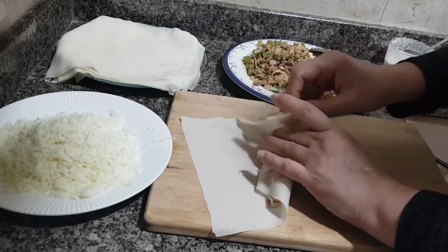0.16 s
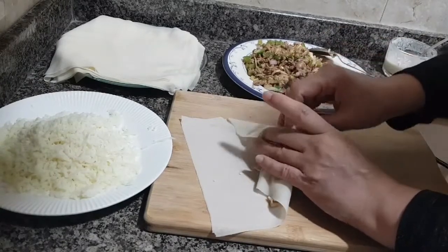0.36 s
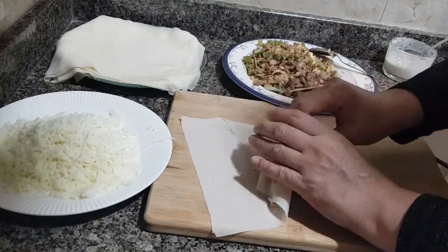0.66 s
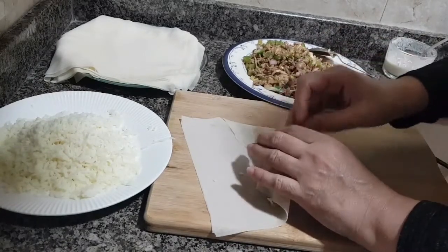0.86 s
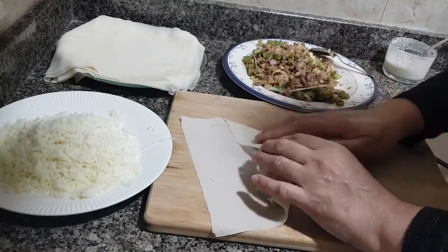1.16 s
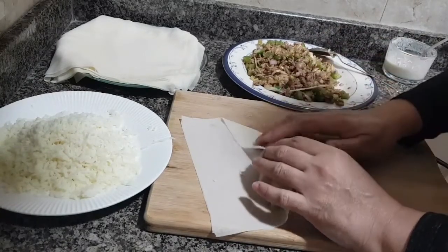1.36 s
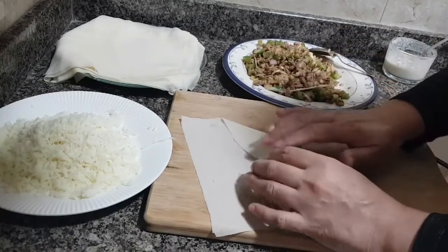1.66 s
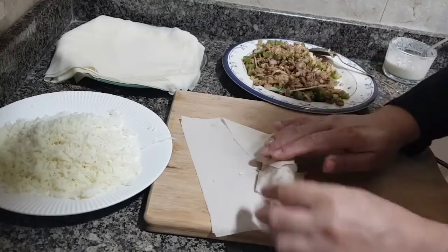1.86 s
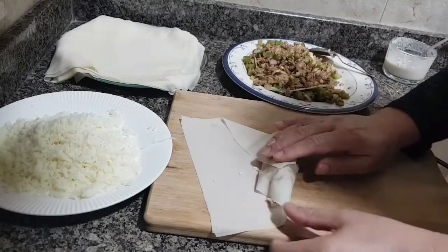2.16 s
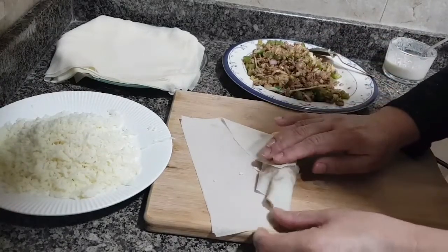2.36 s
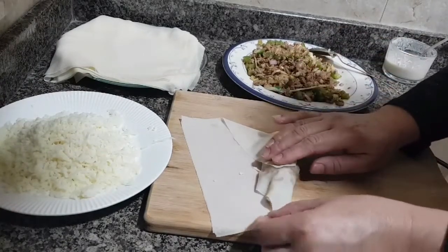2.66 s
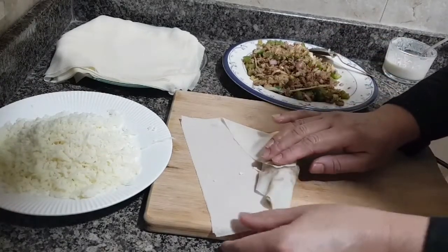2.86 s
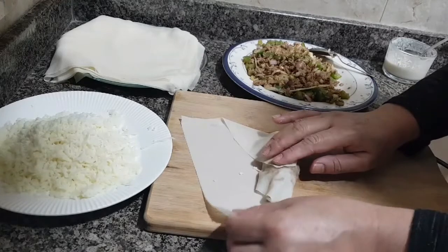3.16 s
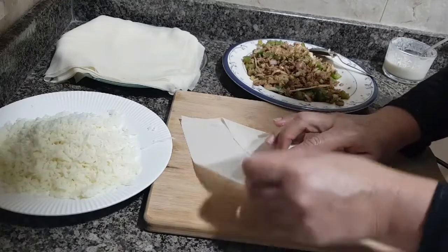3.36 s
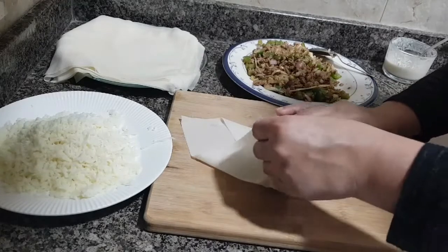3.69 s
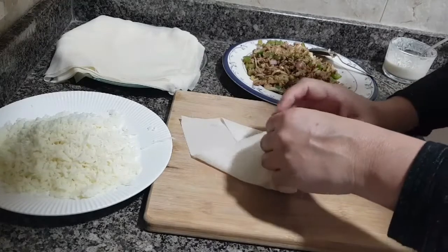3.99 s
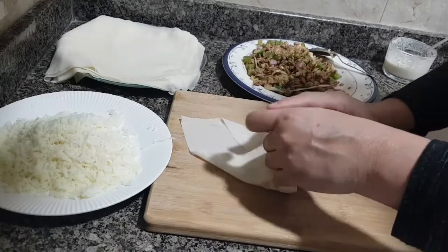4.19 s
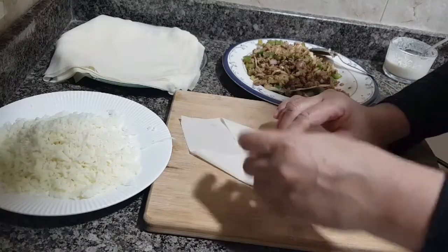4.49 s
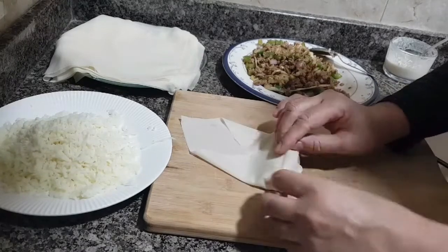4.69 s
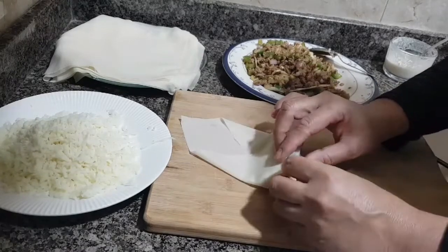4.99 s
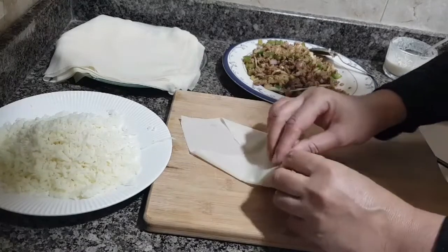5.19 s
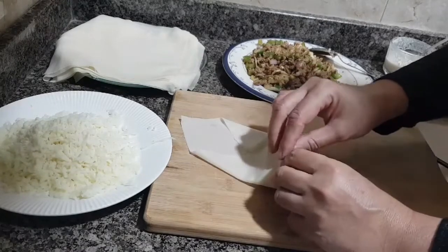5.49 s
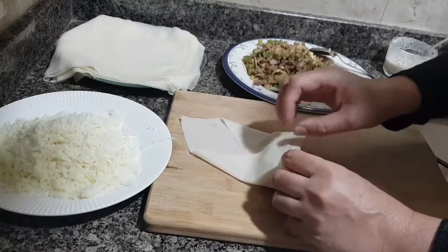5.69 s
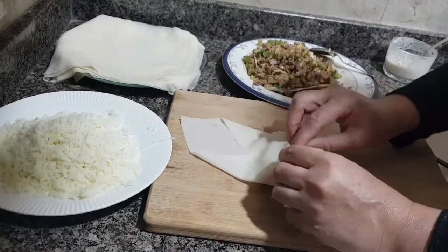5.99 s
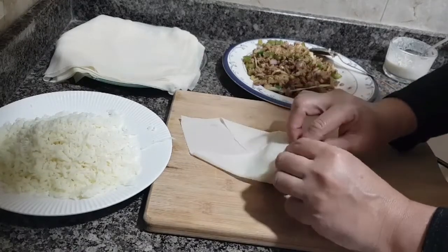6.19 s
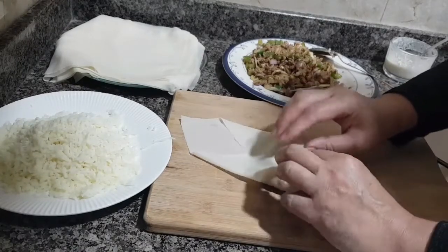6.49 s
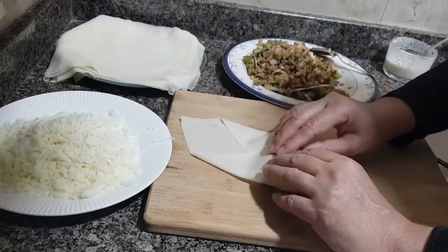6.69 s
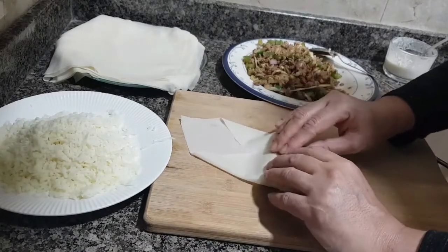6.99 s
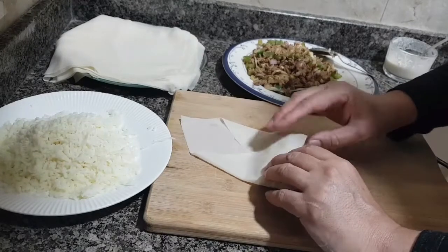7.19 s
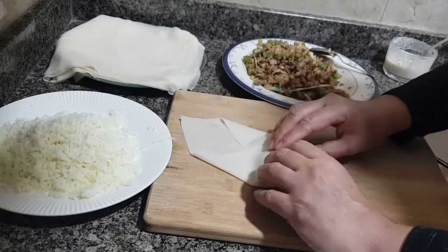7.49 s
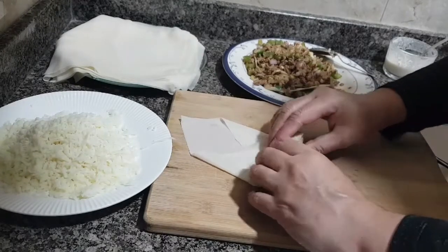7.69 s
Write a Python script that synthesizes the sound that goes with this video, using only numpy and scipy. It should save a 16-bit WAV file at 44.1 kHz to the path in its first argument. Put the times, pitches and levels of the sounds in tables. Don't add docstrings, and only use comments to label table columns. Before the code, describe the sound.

Continuous ventilation noise in a small hard-surfaced kitchen, heavy in the bass, with uneven low throbs, a constant hum and a thin mid-pitched whine above it. Early on, a small object clicks once on a hard counter with a short room echo. A distant tap adds soft, bright hiss in brief touches, then about a second from just after two, and nearly two seconds at the end. Wide stereo pickup.

```python
import sys
import numpy as np
from scipy import signal
from scipy.fft import rfft, irfft, next_fast_len
from scipy.io import wavfile
from scipy.ndimage import uniform_filter1d, map_coordinates

SR = 44100
rng = np.random.default_rng(int(sys.argv[2]) if len(sys.argv) > 2 else 0)


def magnitude_from_level(level_db):
    exponent = np.asarray(level_db, float) / 20
    return 10 ** exponent


def master_out(mix):
    frames = np.transpose(np.atleast_2d(mix))
    ceiling = np.clip(frames, -1, 1)
    pcm = np.round(ceiling * 32767).astype(np.int16)
    wavfile.write(sys.argv[1], SR, pcm)


N = 346185
STEP = 32
GRID_S = np.arange(0, N + STEP, STEP) / SR


def unit(x):
    return x / np.sqrt(np.mean(x ** 2) + 1e-20)


def along(points, hz):
    f, v = np.transpose(points)
    return np.interp(np.log(hz + 1), np.log(f + 1), v)


def level_curve(rows):
    s, db = np.transpose(rows)
    return magnitude_from_level(np.interp(np.arange(N) / SR, s, db))


def fine(coarse):
    return np.interp(np.arange(N) / STEP, np.arange(len(coarse)), coarse)


def wobble(rate):
    knots = rng.standard_normal(N // 100)
    return fine(map_coordinates(knots, [GRID_S * rate]))


def surges(s, db, length_s):
    from_peak = (GRID_S - s[:, None]) / length_s[:, None]
    return magnitude_from_level(db)[:, None] * np.exp(-2 * from_peak ** 2)


def filtered(x, response):
    m = next_fast_len(x.shape[-1] + SR // 2)
    spectrum = rfft(x, m) * response(np.fft.rfftfreq(m, 1 / SR))
    return irfft(spectrum, m)[..., :x.shape[-1]]


def resonances(modes, f):
    total = 0
    for k, (c, w, db) in enumerate(modes):
        total = total + (-1) ** k * magnitude_from_level(db) * 1j * f * w / (c * c - f * f + 1j * f * w)
    return total


def bumps(modes, f):
    return magnitude_from_level(sum(db / (1 + (2 * (f - c) / w) ** 2) for c, w, db in modes))


def tone(hz, level, flutter_db, drift_hz, rate, lead=0):
    phase = 2 * np.pi * np.cumsum(hz + drift_hz * wobble(rate)) / SR
    loudness = np.sqrt(2) * level * magnitude_from_level(flutter_db * wobble(rate))
    return loudness * np.sin(phase + lead * np.array([[.5], [-.5]]))


def spaced(pair):
    # frequency in Hz, correlation.
    likeness = [(30, .995), (160, .995), (240, .5), (300, .8), (370, .4), (520, .9), (620, .55), (800, .6),
                (1200, .5), (2000, .25), (4000, .05), (16000, 0)]
    # frequency in Hz, phase in radians.
    right_lead = [(30, 0), (200, 0), (240, 1), (300, .4), (390, 1.3), (520, .2), (850, .7), (1250, 2.8),
                  (1700, 3.3), (3000, 6)]

    def mid_side_gains(hz):
        turn = np.arccos(np.clip(along(likeness, hz), -1, 1)) / 2
        return np.array([np.cos(turn), np.sin(turn)])

    mid, side = filtered(pair, mid_side_gains)
    left_right = np.array([mid + side, mid - side])
    half = np.array([[-.5], [.5]])
    return filtered(left_right, lambda hz: np.exp(1j * along(right_lead, hz) * half))


def tail(live):
    # frequency in Hz, time to fall 60 dB in seconds.
    ring_time = [(100, 0.62), (1000, 0.54), (3000, 0.27), (8000, 0.25), (15000, 0.074)]
    hz, t, z = signal.stft(rng.standard_normal((2, SR // 2)), SR, nperseg=256)
    decay = magnitude_from_level(-60 * t / (live * along(ring_time, hz)[:, None]))
    answer = spaced(signal.istft(z * decay, SR, nperseg=256)[1])
    return answer / np.linalg.norm(answer[0])


def diffuse(colour, paths_db):
    answer = filtered(tail(live=1.0), lambda hz: hz / (hz + 900))
    source = rng.standard_normal((1, N + SR))
    point = signal.fftconvolve(source, answer, axes=1)[:, SR:SR + N]
    even = spaced(rng.standard_normal((2, N)))
    return unit(filtered(even + magnitude_from_level(paths_db) * point, colour))


def tap():
    # start in seconds, end in seconds, level in dB, splash in dB.
    runs = [(-.1, .06, -64, 6), (.33, .37, -74, 0), (0.878, 0.967, -71.5, -3), (1.96, 2.032, -63, 5),
            (2.13, 2.16, -68, -3), (2.258, 3.385, -63.5, 0), (2.9, 3.1, -71, -3), (3.157, 3.391, -66.5, 6),
            (3.421, 3.5, -72, -2), (5.33, 5.402, -72, 0), (6.016, 7.999, -65, -6), (7.4, 7.55, -73, -6)]
    # frequency in Hz, density in dB per Hz.
    spray_colour = [(1500, -42), (3500, -15), (4700, -7), (5800, -7.5), (7000, -2.5), (8500, -1.5),
                    (10500, -4), (13000, -5), (16000, -11)]
    # frequency in Hz, width in Hz, lift in dB.
    pipe = [(5210, 220, 13.5), (6860, 370, 2), (8270, 630, 2.4), (10500, 360, 1.8), (12000, 500, 2.5)]
    open_db_per_s, shut_db_per_s, trickle_db = 350, 260, -78

    start, end, db, splash_db = np.transpose(runs)[:, :, None]
    opening_db = open_db_per_s * np.maximum(start - GRID_S, 0)
    shutting_db = shut_db_per_s * np.maximum(GRID_S - end, 0)
    flow = magnitude_from_level(db - opening_db - shutting_db)

    def flow_level(each):
        return fine(np.sqrt(magnitude_from_level(2 * trickle_db) + (each ** 2).sum(0)))

    spray = diffuse(lambda hz: magnitude_from_level(along(spray_colour, hz)) * bumps(pipe, hz), paths_db=3)
    splash = diffuse(lambda hz: resonances([(3560, 2000, 0)], hz) ** 2, paths_db=4)
    water = flow_level(flow) * spray + magnitude_from_level(-7) * flow_level(flow * magnitude_from_level(splash_db)) * splash
    return magnitude_from_level(1.0 + 0.71 * wobble(20)) * water


def clicks():
    # time in seconds, peak in dB, left-right balance in dB.
    blows = [
        (1.1885, -38.5, -2),
    ]
    # frequency in Hz, width in Hz, level in dB.
    object_modes = [(2463, 700, 2), (3400, 640, 4), (5540, 1700, -8), (8350, 790, -6.5), (10600, 1756, -12)]
    out = np.zeros((2, N + SR))
    t = np.arange(SR // 4) / SR
    for s, db, pan_db in blows:
        room = magnitude_from_level(6.0) * tail(live=.8)[:, :len(t)]
        near_echoes = magnitude_from_level(-17.0 - 60 * t / 0.057) * rng.standard_normal((2, len(t)))
        heard = room + near_echoes
        heard[:, 0] += magnitude_from_level(-3 + pan_db * np.array([.5, -.5]))
        first = round(s * SR)
        out[:, first:first + len(t)] += magnitude_from_level(db + 19) * heard
    return filtered(out[:, :N], lambda hz: resonances(object_modes, hz))


def room_modes():
    # frequency in Hz, width in Hz, level in dB.
    lowest_modes = [(68.9, 7.8, 0.5), (81.4, 6.1, -1)]
    steady_modes = [(101.5, 8.5, 0), (147.8, 11.6, -2.5), (179, 28, -12.5)]
    boom_mode = [(133.4, 8.2, 0)]
    # time in seconds, peak in dB, length in seconds.
    drone_surges = [(0.08, -37, 0.11), (0.49, -39, 0.11), (0.88, -38.5, 0.24), (1.31, -45, 0.23),
                    (1.598, -42, 0.09), (2.008, -39.8, 0.22), (2.22, -39, 0.042), (2.403, -31.5, 0.055),
                    (2.545, -31, 0.035), (2.794, -33, 0.1), (2.976, -34, 0.048), (3.19, -43.7, 0.22),
                    (3.48, -39.5, 0.23), (3.942, -46, 0.22), (4.264, -35, 0.053), (4.37, -38, 0.042),
                    (4.61, -35, 0.12), (5.083, -37.5, 0.15), (5.283, -32, 0.036), (5.91, -44, 0.23),
                    (6.253, -43.2, 0.07), (6.601, -35, 0.05), (6.741, -37, 0.055), (6.98, -35.5, 0.055),
                    (7.16, -47, 0.071), (7.429, -45.5, 0.22), (7.616, -34, 0.036), (7.82, -32.5, 0.12)]
    # time in seconds, peak in dB, length in
    # seconds, pitch in Hz.
    boom_surges = [(0.07, -37, 0.062, 130.3), (0.26, -35, 0.19, 132.1), (0.458, -37.5, 0.071, 131.3),
                   (0.58, -35, 0.052, 135.1), (0.918, -32, 0.24, 132.4), (1.155, -39.5, 0.055, 133),
                   (1.402, -35, 0.14, 133.5), (1.688, -35.5, 0.13, 135), (1.985, -32, 0.11, 133.2),
                   (2.442, -36, 0.15, 135), (2.926, -33.5, 0.16, 132.1), (3.21, -37, 0.17, 129.5),
                   (3.5, -40, 0.049, 131.5), (3.61, -37, 0.23, 133.2), (3.778, -33.5, 0.05, 132.8),
                   (4.444, -42.5, 0.23, 136.1), (5.294, -39.5, 0.13, 133.1), (5.43, -39.5, 0.2198, 135.4),
                   (5.52, -36.5, 0.07, 133.9), (5.713, -37, 0.059, 136.1), (5.891, -34, 0.12, 137.3),
                   (6.092, -38.5, 0.04, 132.8), (6.389, -30.5, 0.16, 133), (6.703, -30.5, 0.068, 134.5),
                   (7.14, -38.5, 0.22, 134.1), (7.598, -33.5, 0.072, 132.4),
                   (2.24, -40, 0.091, 138.2),
        (4.021, -39, 0.061, 130.1),
        (4.842, -40, 0.049, 135.1),
        (7.82, -38.5, .08, 137.6),
    ]

    def ring(modes):
        noise = spaced(rng.standard_normal((2, N)))
        return unit(filtered(noise, lambda f: resonances(modes, f) / (1 + (f / 215) ** 8)))

    lowest = ring(lowest_modes)
    swell = np.sqrt(np.abs(uniform_filter1d(lowest[0] ** 2, 4000))) + 0.045
    drive = magnitude_from_level(-40.5) + fine(surges(*np.transpose(drone_surges)).sum(0))
    drone = filtered(drive * lowest / swell, lambda hz: 1 / (1 + (52 / (hz + 1)) ** 8))

    s, db, length_s, hz = np.transpose(boom_surges)
    each = surges(s, db, length_s)
    total = each.sum(0)
    pitch_hz = (hz @ each + hz.mean() * 1e-5) / (total + 1e-5)
    boom = tone(fine(pitch_hz), 1.315 * fine(total), flutter_db=2, drift_hz=2.205, rate=16)
    return drone + magnitude_from_level(-39.5) * ring(steady_modes) + boom + magnitude_from_level(-44.5) * ring(boom_mode)


def fan():
    # frequency in Hz, density in dB per Hz.
    air = [(20, -16.5), (45, -6), (120, -0.5), (210, -4), (260, -9), (460, -17.5), (1000, -16.5),
           (1600, -12), (1800, -25.5), (2800, -30), (3200, -35), (5000, -41.5), (9000, -46), (16000, -51.5)]
    # frequency in Hz, width in Hz, lift in dB.
    duct = [(427, 70, 6.5), (551, 71, 5.5), (640, 32, -3.5), (671.4, 30, 7), (988, 120, 3),
            (1480, 300, -6.5), (2150, 510, 3), (2770, 29, 7), (3957, 30, 6.5), (4200, 530, 2),
            (5130, 240, 2.5), (7500, 570, -1), (8060, 950, 2.5)]
    spot = [(267, 10, -6), (36, 14, 5), (284, 14, 8), (310, 12, 2), (336, 14, 3), (378, 8, -4),
            (389, 10, 6), (458, 18, -5), (486, 14, -3), (502, 14, 5), (821, 16, 1), (1050, 40, -3),
            (1113, 20, 7), (1132, 12, -4), (1155, 26, 3), (1225, 20, -4), (1269, 30, 3), (1440, 22, 4)]
    # time in seconds, rms level in dB.
    blade_level = [(0, -44), (1, -43.5), (2.05, -42.5), (3, -44.5), (5.3, -42.5), (5.6, -45.5), (6.4, -42),
                   (7.2, -44), (7.85, -44)]
    whine_level = [(0, -56), (.9, -56.5), (1.8, -54.5), (2.45, -60), (3.3, -55.5), (3.5, -55.5), (4.7, -58),
                   (5.5, -53.5), (6.4, -56.5), (7.85, -55)]
    blade_hz, whine_hz = 203.8, 692

    rush = diffuse(lambda hz: magnitude_from_level(along(air, hz)) * bumps(duct + spot, hz), paths_db=0.5)
    rush = magnitude_from_level(-41.5 + 0.12 * wobble(1.39)) * rush
    blade = tone(blade_hz, level_curve(blade_level), flutter_db=1.5, drift_hz=.7, rate=6)
    whine = tone(whine_hz, magnitude_from_level(0.5) * level_curve(whine_level), flutter_db=0.8, drift_hz=0.65,
                 rate=9, lead=1.3)
    return rush + blade * magnitude_from_level([[.3], [-.3]]) + whine * magnitude_from_level([[2.1], [1.9]])


def scene():
    return tap() + clicks() + room_modes() + fan()


def roll_off(x):
    return signal.sosfilt(signal.butter(12, 15720, fs=SR, output="sos"), x)


def record(dry):
    # frequency in Hz, left-right difference in dB.
    balance = [(60, 0.5), (110, 1), (200, 4), (380, 2), (700, -1), (1290, 0.5), (2380, 1), (4400, -1),
               (8120, 0.5), (15000, 0.0)]
    top_hz = 15720
    half = np.array([[.5], [-.5]])
    mix = filtered(dry, lambda hz: magnitude_from_level(along(balance, hz) * half) * (hz < top_hz))
    return roll_off(mix)


dry = scene()
out = record(dry)
master_out(out)
```